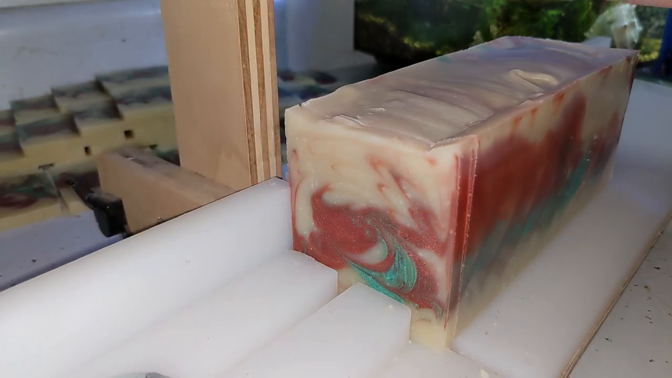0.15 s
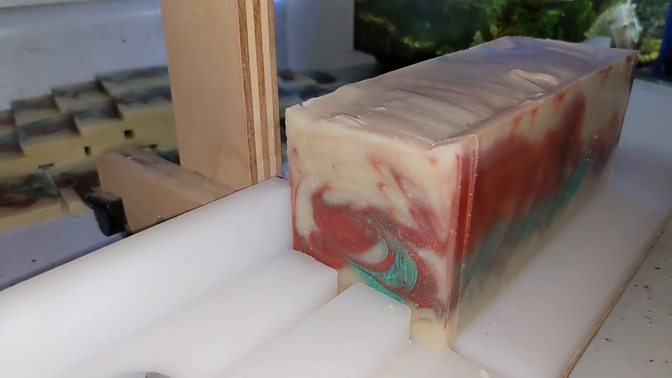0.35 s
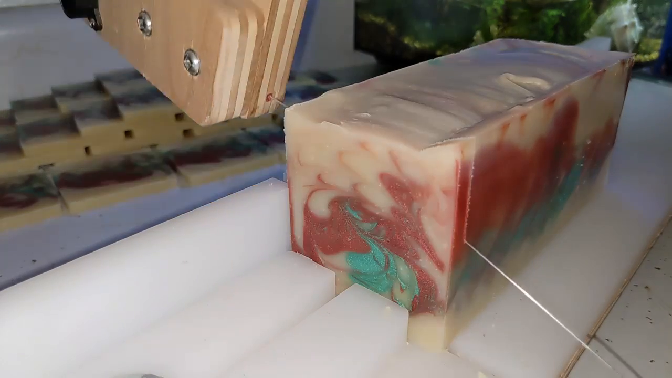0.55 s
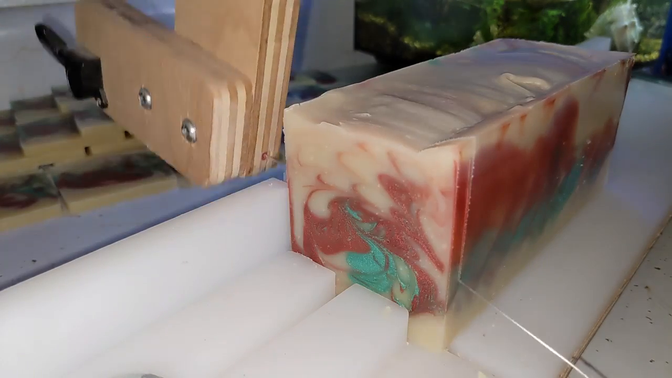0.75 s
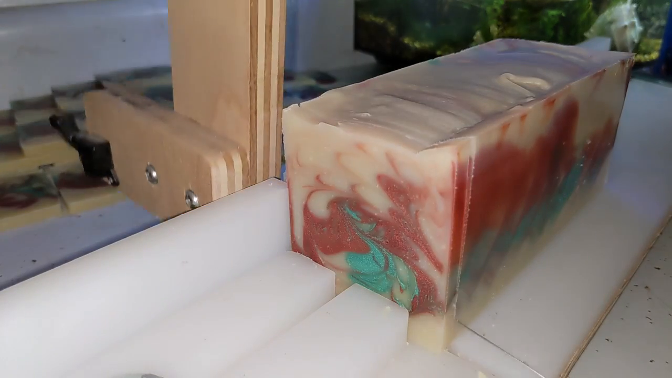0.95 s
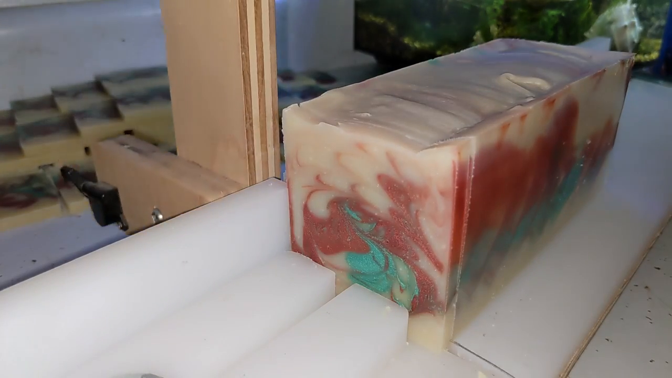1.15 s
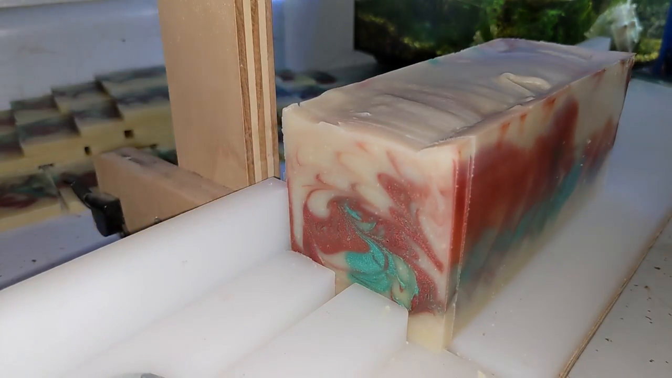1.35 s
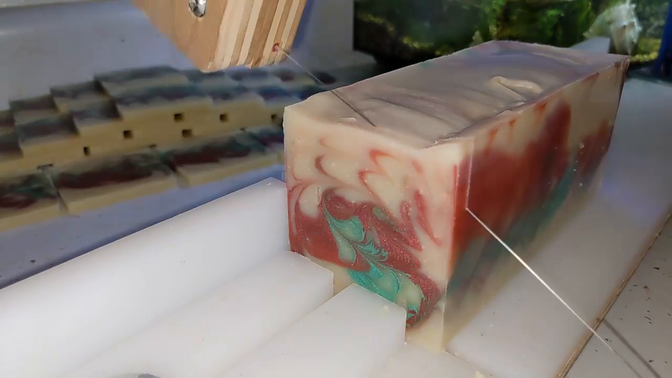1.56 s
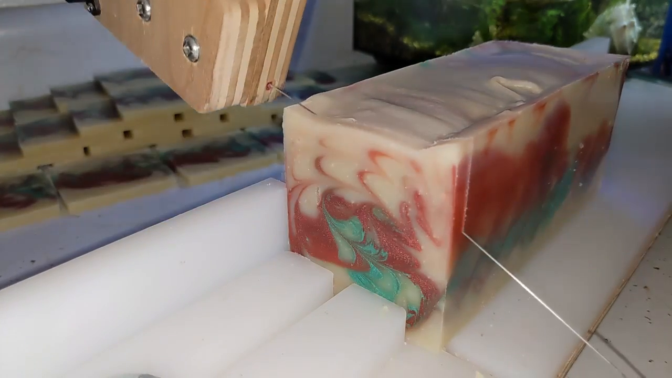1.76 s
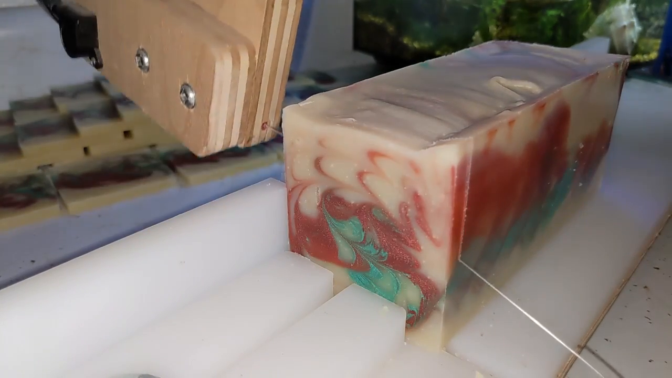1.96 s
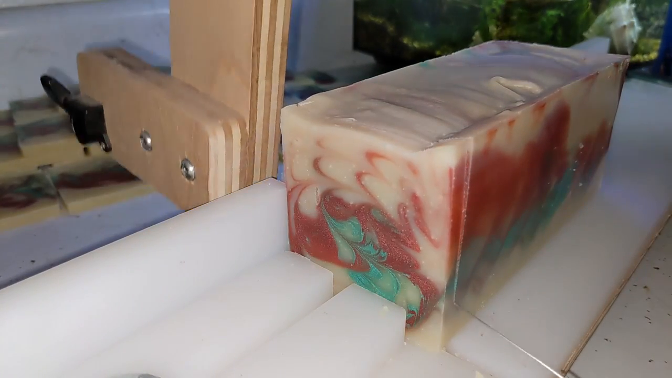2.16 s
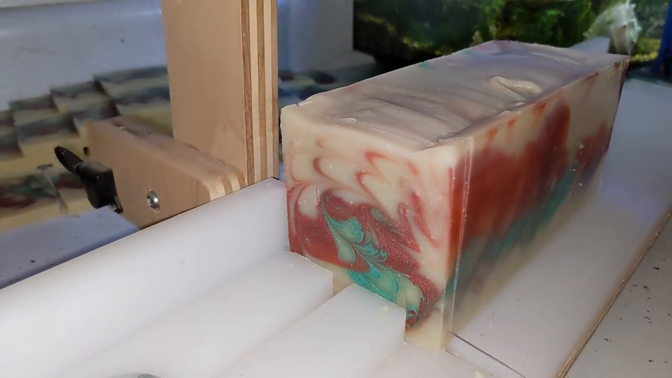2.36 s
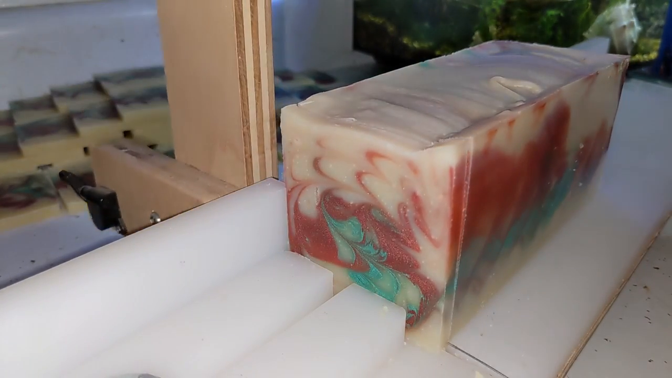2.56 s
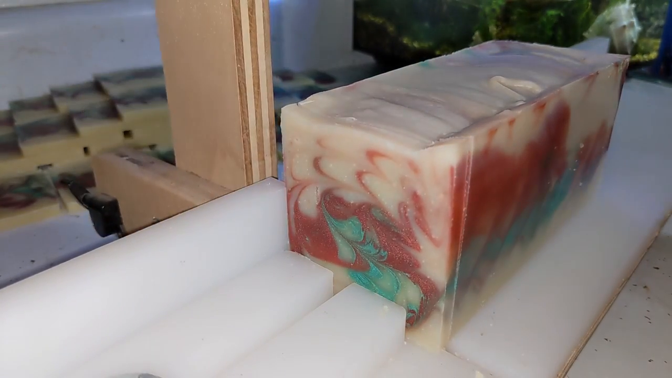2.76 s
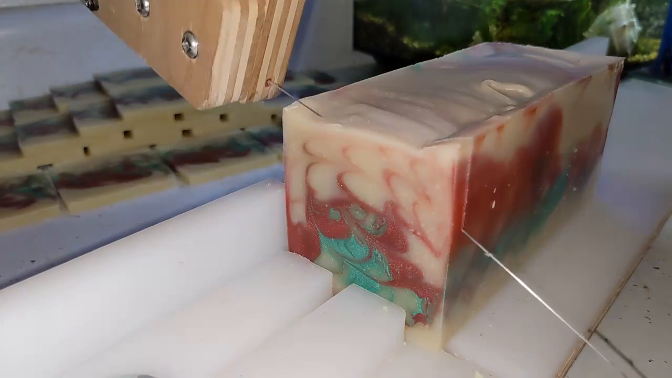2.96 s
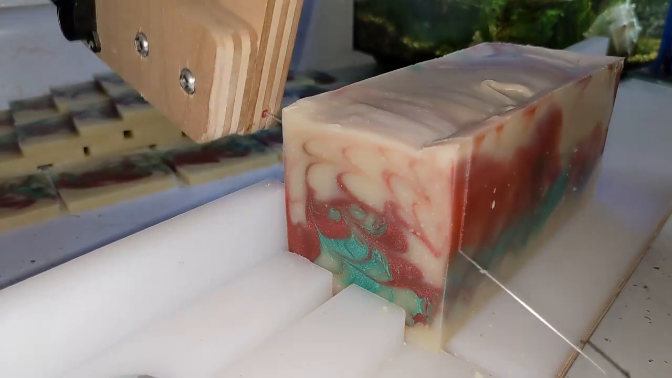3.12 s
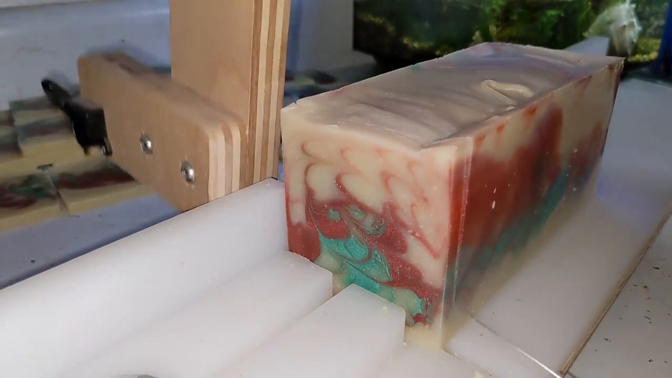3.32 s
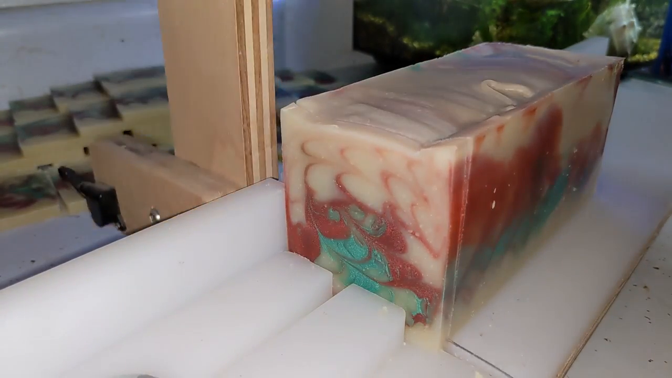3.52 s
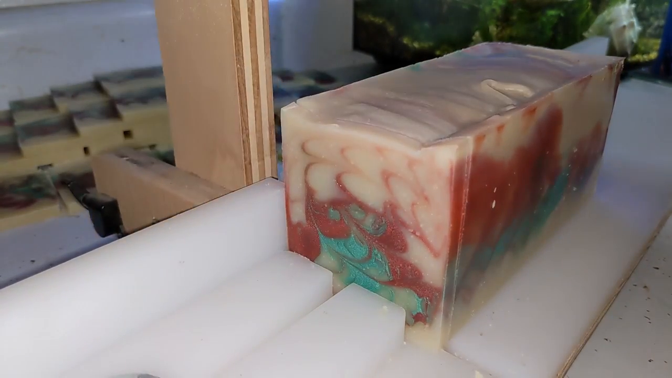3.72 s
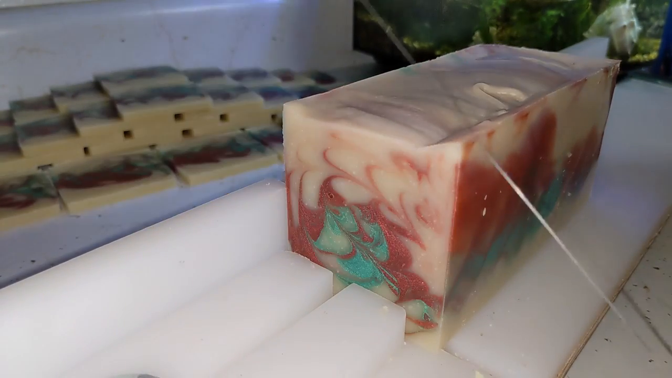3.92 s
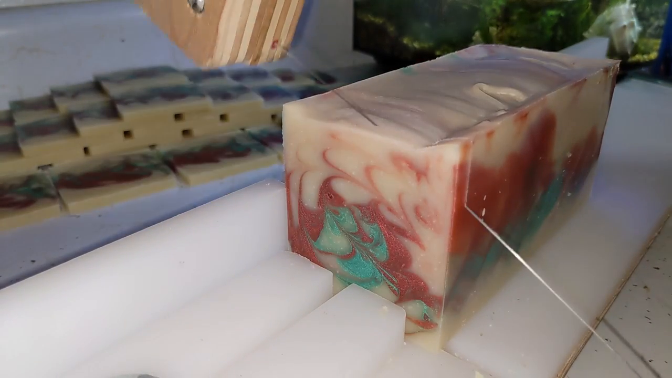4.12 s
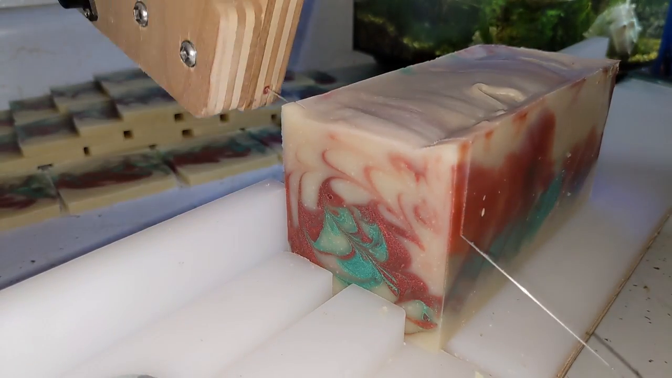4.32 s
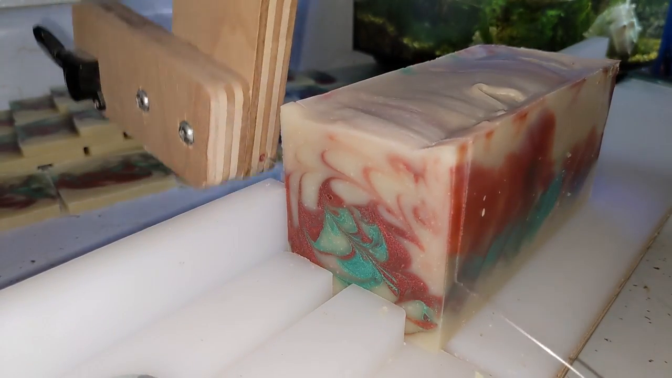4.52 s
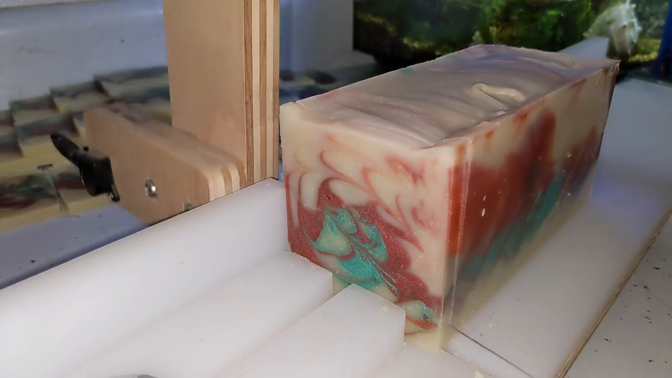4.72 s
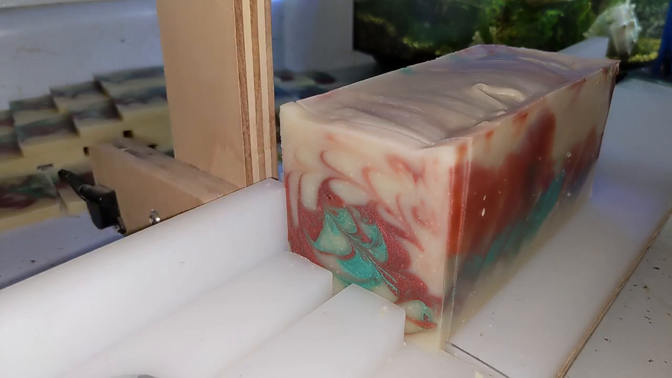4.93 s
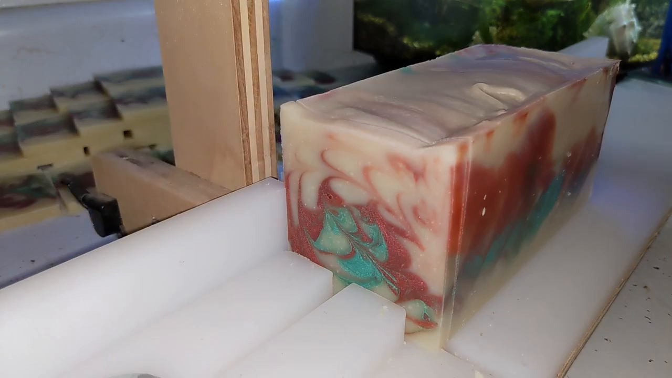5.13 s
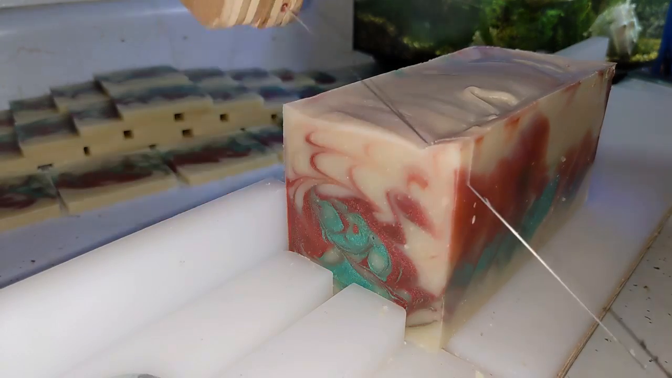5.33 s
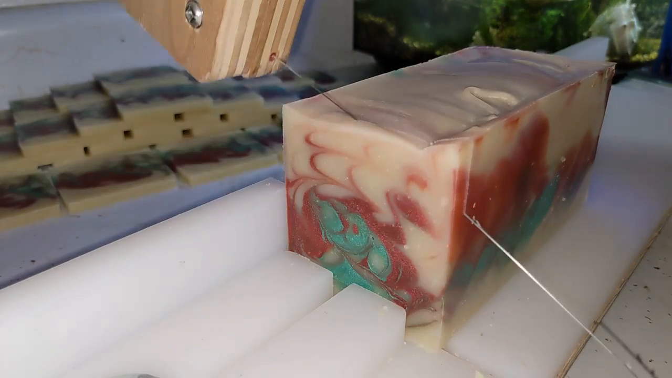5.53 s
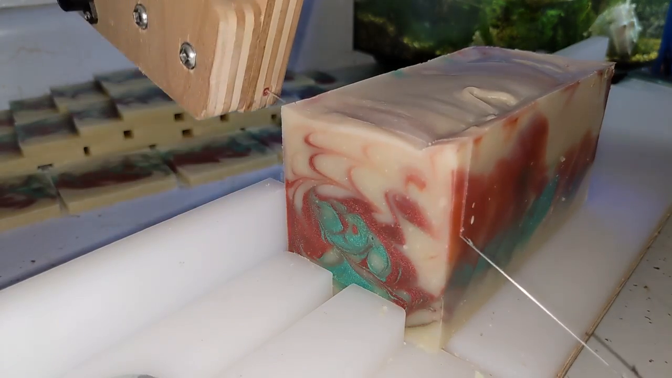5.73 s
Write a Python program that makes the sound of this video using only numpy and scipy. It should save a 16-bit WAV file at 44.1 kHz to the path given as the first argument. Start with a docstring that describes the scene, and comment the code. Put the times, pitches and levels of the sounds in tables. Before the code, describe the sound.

A wire cutter drags through soap with sticky crackling ticks, each of five strokes ending in a sharp crack and woody bench thump.

```python
"""Wire soap cutter

A home workshop, close to a pair of microphones. The wire drags through the loaf with sticky ticks (noise snaps
with gritty tails), then the arm lands: a crack (noise burst), a wooden body and late bench thump (decaying modes)
and the wire ringing on (two beating sines). The pivot pings and knocks (resonators).
A low rumble with hum lines, rubbing, brushing and a fine hiss lie underneath (shaped noise)."""
import sys
import numpy as np
from scipy import signal
from scipy.fft import rfft, irfft
from scipy.io import wavfile

SR = 44100
rng = np.random.default_rng(int(sys.argv[2]) if len(sys.argv) > 2 else 0)


def volts_from_db(level):
    """Convert decibel levels to linear amplitude ratios."""
    exponent = np.asarray(level, float) / 20
    return 10 ** exponent


def transcribe(u):
    """Save the signal u as a 16-bit wav file named by the first command-line argument.

    u: samples, shape (n,) or (channels, n), limited to [-1, 1]; the rate is SR.
    q: integer samples, one column per channel.
    """
    v = np.clip(np.atleast_2d(u).T, -1, 1)
    q = np.round(v * 32767).astype(np.int16)
    wavfile.write(sys.argv[1], SR, q)


N = 254898


def rms_one(x):
    """Scale to rms 1."""
    return x / np.sqrt(np.mean(x ** 2) + 1e-20)


def at_hz(points, hz):
    """Read a table on a log-frequency axis."""
    p = np.array(points, float)
    return np.interp(np.log(hz), np.log(p[:, 0] + 1), p[:, 1])


def in_time(rows):
    """Control curve at every sample."""
    return np.interp(np.arange(N) / SR, *np.transpose(rows))


def drift(rate_hz):
    """Slow random wander of rms 1: noise through a double one-pole low-pass."""
    r = np.exp(-2 * np.pi * rate_hz / SR)
    settle = 9000
    return rms_one(signal.lfilter([1], [1, -2 * r, r * r], rng.standard_normal(N + settle))[settle:])


def clicks(times, gains):
    """Single samples at the given moments."""
    out = np.full(N, 1e-18)
    np.add.at(out, np.round(np.asarray(times) * SR).astype(int), gains)
    return out


def panned(times, db, pan_db):
    """A click train for each port."""
    return np.array([clicks(times, volts_from_db(db + pan_db / 2)), clicks(times, volts_from_db(db - pan_db / 2))])


def fade(x, tau_s):
    """Each click becomes a decaying exponential."""
    return signal.lfilter([1], [1, -np.exp(-1 / (max(tau_s, 1e-5) * SR))], x)


def lead_in(x, tau_s):
    """Each click becomes an exponential that rises up to it."""
    return fade(x[:, ::-1], tau_s)[:, ::-1]


def swell(x, tau_s):
    """Unit-gain double low-pass: an envelope takes time to grow."""
    return fade(fade(x, tau_s), tau_s) * (1 - np.exp(-1 / (tau_s * SR))) ** 2


def ring(x, hz, t60_s):
    """Two-pole resonator: a unit click sets a sine of initial height 1 ringing."""
    r, w = volts_from_db(-60 / (t60_s * SR)), 2 * np.pi * hz / SR
    return signal.lfilter([0, np.sin(w)], [1, -2 * r * np.cos(w), r * r], x)


def band(x, low_hz, high_hz):
    """Butterworth band-pass."""
    return signal.sosfilt(signal.butter(2, [low_hz, min(high_hz, .45 * SR)], "band", fs=SR, output="sos"), x)


def evened(x, times, db, span_s):
    """Rough contacts differ in shape but keep their strength: each is scaled to the usual energy for its dB."""
    order = np.argsort(times)
    start = np.round(times[order] * SR).astype(int)
    end = np.minimum(start + round(span_s * SR), N - 1)
    energy = np.cumsum(np.sum(x ** 2, axis=0))
    ratio = np.sqrt(energy[end] - energy[start - 1] + 1e-30) / volts_from_db(db[order])
    gain = np.median(ratio) / ratio
    return x * gain[np.maximum(np.searchsorted(start, np.arange(N), "right") - 1, 0)]


# left-right likeness of broad noise: (frequency [Hz], likeness [0-1])
LIKENESS = [(60, .85), (290, .82), (640, .33), (1400, .08), (15000, .05)]


def coloured(spectrum):
    """Stereo noise of a given spectrum; mid and side are weighted by the likeness of the ports; rms 1."""
    hz = np.arange(1, N // 2 + 2) * SR / N
    alike = np.clip(at_hz(LIKENESS, hz), 0, 1)
    mid, side = rfft(rng.standard_normal((2, N))) * volts_from_db(at_hz(spectrum, hz))
    pair = np.sqrt(1 + alike) * mid + np.sqrt(1 - alike) * side * [[1], [-1]]
    return rms_one(irfft(pair, N))


def port_noise(shared):
    """White noise of which a share of the power reaches both ports, the right one late."""
    lag_samples = 4
    common, own = rng.standard_normal(N), rng.standard_normal((2, N))
    share = np.clip(shared, 0, 1)
    return np.sqrt(share) * np.array([common, np.roll(common, lag_samples)]) + np.sqrt(1 - share) * own


def struck(times, db, modes, contact_s, spread_db, late_cycles):
    """A rough contact of a few ms excites every mode; bending waves spread, so low modes start late."""
    out = np.zeros((2, N))
    strength_db = spread_db * rng.standard_normal((len(times), len(modes)))
    for k, (hz, level_db, t60_s) in enumerate(modes):
        gain_db = db + level_db + strength_db[:, k]
        contact = swell(clicks(times + late_cycles / hz, volts_from_db(gain_db)), contact_s)
        push = contact * np.sqrt(4 * contact_s * SR)
        out += evened(ring(push * port_noise(0.58), hz, t60_s), times, gain_db, .05)
    return out


def swelling(times, db, modes, spread_db):
    """Low modes take up the blow slowly, so they peak late; strength and tuning differ blow by blow."""
    out, t = np.zeros((2, N)), np.arange(N) / SR
    for hz, level_db, t60_s, swell_s in modes:
        for s, d in zip(times, db):
            i, span = round(s * SR), round(t60_s * 2 * SR)
            decay_db = d + level_db + spread_db * rng.normal() - 60 * t[:span] / t60_s
            shape = swell(volts_from_db(decay_db), swell_s)
            phase = rng.uniform(0, 2 * np.pi) + rng.normal(0, .4, (2, 1))   # ports differ a little
            tuned_hz = hz * rng.normal(1, 0.0071)
            out[:, i:i + span] += shape * np.sin(2 * np.pi * tuned_hz * t[:span] + phase)
    return out


# drag of wire and hand on the soap: (time [s], level [dB])
DRAG = [(0.0, -63), (0.1, -71), (0.25, -76), (0.67, -70.5), (0.95, -65), (1.17, -72.5), (1.5, -73),
        (1.55, -70.5), (1.95, -71), (2.12, -65), (2.28, -66), (2.45, -73.5), (2.8, -76.5), (3.16, -71),
        (3.4, -59), (3.72, -77), (3.89, -63), (4.08, -64), (4.28, -69), (4.46, -71), (4.64, -60),
        (4.81, -67), (5.0, -76.5), (5.28, -69.5), (5.6, -72), (5.78, -79)]


def drag_level():
    """Drag in dB at every sample; steers rubbing, hiss and deep rumble."""
    return in_time(DRAG)


# swells and steps of the rumble: (time [s], level [dB])
SWELL = [(0.0, -61.5), (0.2, -68.5), (0.415, -68.5), (0.425, -64), (1.17, -63), (1.35, -70.5),
         (1.51, -60.5), (1.95, -59), (2.45, -65), (3.7, -63), (3.885, -58.5), (3.895, -65), (4.3, -62.5),
         (4.64, -65), (5.29, -65), (5.3, -64), (5.6, -66), (5.78, -70.5)]


def rumble_level():
    """Rumble in dB at every sample."""
    return in_time(SWELL)


# deep rumble spectrum: (frequency [Hz], relative density [dB])
DEEP = [(25, -31.5), (40, -14), (55, 2.5), (70, -16.5), (90, -9), (120, -4), (150, -19), (250, -56.5)]


def deep_rumble():
    """Lowest noise: swings wider than the rumble and sinks while the loaf is pressed, as drag rises."""
    steered_db = -71 + 3.2 * (rumble_level() + 63.5) - 1 * (drag_level() + 71)
    return volts_from_db(steered_db + 1.8 * drift(3.9)) * coloured(DEEP)


# rumble spectrum: (frequency [Hz], relative density [dB])
RUMBLE = [(65, -34), (110, -5), (265, -6.5), (307, -9.5), (333, -15), (359, 0), (386, -4), (1000, -18.5),
          (1300, -36), (2200, -120)]
# hum lines: (frequency [Hz], level over rumble noise [dB], damping: t60 is 0.63 over this [Hz])
HUM = [(65, -11.5, 0.79), (108.4, -12, 1.4), (169.6, -5.5, 4.1), (311.1, -5.5, 3.3), (380, -16, 17),
       (1137, -14.5, 5.5)]


def rumble_and_hum():
    """Low noise plus hum lines that waver, each a resonator fed with noise."""
    hum = sum(volts_from_db(db) * rms_one(ring(rng.standard_normal(N), hz, 0.63 / damping)) for hz, db, damping in HUM)
    return volts_from_db(rumble_level() + 1.1 * drift(5.7)) * (coloured(RUMBLE) + hum)


# hiss spectrum: (frequency [Hz], relative density [dB])
HISS = [(1760, -16.5), (3000, -4), (6670, -7.5), (7210, -7), (8500, -12.5), (15100, -9.5), (16200, -19),
        (16500, -51)]


def hiss():
    """Fine noise that rises with the drag but never sinks below the microphone's own."""
    steered = volts_from_db(-71 + 1 * (drag_level() + 68))
    mic_floor = volts_from_db(-73)
    return np.maximum(steered, mic_floor) * volts_from_db(0.96 * drift(17)) * coloured(HISS)


# rubbing spectrum: (frequency [Hz], relative density [dB])
RUBBING = [(410, -41), (700, -8.5), (806, -20), (1150, -2), (1570, -6), (3500, -10), (4550, -37.5),
           (7700, -120)]


def rubbing():
    """Friction noise at the drag level, slowly and finely uneven."""
    return volts_from_db(drag_level() + 2.2 * drift(30) + 1.5 * drift(300)) * coloured(RUBBING)


# a hand brushes the loaf: (time [s], half length [s], level [dB])
SWISHES = [(0.406, .02, -64.5), (2.913, 0.018, -63), (3.844, 0.043, -57), (5.247, 0.035, -59.5)]
# brushing spectrum: (frequency [Hz], relative density [dB])
SWISH = [(900, -30), (1800, -5), (3000, -0.5), (7000, -3.5), (9000, -6.5), (15000, -7), (16300, -16),
         (16600, -48)]


def brushing():
    """Bright noise under flat-topped envelopes."""
    t = np.arange(N) / SR
    swish = sum(volts_from_db(db) * np.exp(-((t - s) / half_s) ** 4 / 2) for s, half_s, db in SWISHES)
    return swish * volts_from_db(2.0 * drift(45)) * coloured(SWISH)


# pivot: (time [s], ping level [dB], frequency [Hz], tick level [dB])
PINGS = [(0.4886, -56, 1665, -35.5), (1.527, -60.5, 1480, -46.5), (1.6649, -64, 1530, -40),
         (1.719, -58, 1660, -42), (1.889, -55.5, 1830, -38), (2.932, -57, 1640, -45.5),
         (3.1002, -59, 1800, -37.5), (4.2475, -58.5, 1650, -54), (5.596, -62.5, 1620, -44),
         (5.678, -65.5, 1650, -45)]
# the arm meets its upper stop: (time [s], level [dB])
KNOCKS = [(4.1227, -30.5), (5.4263, -31)]
# modes of the stop: (frequency [Hz], level [dB], t60 [s])
STOP = [(302, -19.5, 0.14), (426, -11, 0.045), (625, -17, 0.035), (820, -17, 0.04), (1270, -7.5, 0.033),
        (1525, -1, 0.019), (1580, -5.5, 0.036), (2170, -20, 0.026), (2980, -2.5, 0.036), (4580, -4, 0.025),
        (6400, 2.5, 0.0094), (9100, -7, 0.014)]


def pivot():
    """Short single-note resonator pings, nearer the right port, and two modal knocks on the stop."""
    pings = np.zeros(N)
    for s, db, hz, _ in PINGS:
        pings += ring(swell(clicks([s], volts_from_db(db + 21)), 0.00025), hz, 0.042)
    s, db = np.transpose(KNOCKS)
    rattle_shape = swell(fade(clicks(s, volts_from_db(db - 12.5)), 0.013), 0.0002)
    rattle = band(rattle_shape * port_noise(0.14), 330, 11000)
    return pings * volts_from_db(np.array([[-2.5], [2.5]])) + struck(s, db + 0.5, STOP, 0.0018, 1.14, 1.97) + rattle


# crack spectrum: (frequency [Hz], relative density [dB])
CRACK = [(530, -29.5), (900, -17), (2080, -6), (4770, -5), (5320, -9), (6010, -5), (9780, -7), (11500, -2),
         (15700, -4), (16500, -40.5)]


def crack(s, db, pan_db):
    """Wire and arm land over some 6 ms: a noise burst with a brief fade-in ahead and a tail."""
    hits = panned(s, db, pan_db)
    burst = fade(fade(hits, 0.006), 0.00055) / (0.00041 * SR)
    burst += volts_from_db(-14.5) * fade(hits, 0.026) + volts_from_db(-29.5) * fade(hits, 0.029)
    burst += lead_in(panned(s, db - 5.5, pan_db), 0.00069)     # noise rises steeply into the crack
    burst += lead_in(panned(s, db - 26, pan_db), 0.004)
    burst *= volts_from_db(2.5 * drift(150) + 0.8 * drift(40))     # the frame rattles unevenly
    return evened(burst * coloured(CRACK), s - .012, db, .025)


# frame modes: (frequency [Hz], level [dB], t60 [s])
FRAME = [(1110, -8, .03), (1400, -3, .045), (1790, -9, .025), (2170, -6, .03), (2320, -7, .045),
         (2850, -12, .025), (3200, -12, .025)]
# wooden body modes: (frequency [Hz], level [dB], t60 [s], swell [s])
BODY = [(201.2, -11, 0.063, 0.023), (277.7, -4.5, 0.046, 0.0026), (312, -11, 0.043, .006),
        (389.4, -4.5, .09, 0.0047), (429.2, -0.5, 0.081, 0.0018), (462, -11, 0.061, 0.01),
        (588, -11, 0.09, 0.0013), (710, -8.5, 0.08, 0.0013), (774, -7.5, .06, 0.0026)]
# bench modes: (frequency [Hz], level [dB], t60 [s], swell [s])
BENCH = [(58, -19, 0.12, 0.018), (102.6, -13, 0.087, 0.0095), (132.5, -7.5, .15, 0.01),
         (154.1, -3.5, .17, 0.0062)]


def wood(s, db):
    """Frame modes ring first, body modes swell, the bench thumps last; noise stands for dense wood modes."""
    frame = struck(s, db - 0.8, FRAME, 0.0052, 4.7, 2.9)
    body = evened(swelling(s + .003, db + 2.5, BODY, 1.3), s, db, .04)
    bench = swelling(s + 0.011, db - 1.15, BENCH, 0.5)
    dense = fade(clicks(s, volts_from_db(db + 10)), 0.024) + fade(clicks(s, volts_from_db(db - 12.5)), 0.039)
    return frame + body + bench + band(swell(dense, 0.0014) * port_noise(0.28), 110, 610)


def wire(s, db, rings_s):
    """The wire swings in two planes slightly apart in pitch, so it beats; the note ends abruptly."""
    wire_hz, beat_hz, wire_db, t60_s = 367.5, 28, -31.5, 0.8
    out, t = np.zeros(N), np.arange(N) / SR
    for start, level_db, length_s in zip(s, db, rings_s):
        age = t - start
        sounding = volts_from_db(2.7 * drift(25)) * (age > 0) * np.clip((length_s - age) / 0.0025, 0, 1)
        decay = volts_from_db(level_db + wire_db - 60 * np.abs(age) / t60_s)
        planes = np.sin(2 * np.pi * wire_hz * age) + 0.6 * np.sin(2 * np.pi * (wire_hz + beat_hz) * age)
        out += sounding * decay * planes
    return out


# the arm lands: (time [s], crack level [dB], wood level [dB], left-right [dB], wire ringing [s])
BLOWS = [(0.182, -16.5, -27.5, 6.5, 0.19), (1.2887, -15.5, -23.5, 0, 0.4), (2.686, -15.5, -16, 5, 0.2),
         (3.622, -15.5, -24.5, 1, 0.27), (5.049, -16, -22.5, 4.5, 0.15)]


def blows():
    """Each landing sounds the crack, the wood and the wire."""
    s, crack_db, wood_db, pan_db, rings_s = np.transpose(BLOWS)
    return crack(s, crack_db, pan_db) + wood(s, wood_db) + wire(s, crack_db, rings_s)


# soap lets go of the wire: (time [s], level [dB], left-right [dB], fullness: lower against upper treble [dB])
TICKS = [(0.0156, -17, 7, 0), (0.0705, -22, 9.5, -0.5), (0.0865, -32, 3, 1.5), (0.0897, -28, 9.5, 1.5),
         (0.5743, -42.5, 9.5, -3.5), (0.6416, -52, 6.5, 1), (0.6612, -51, 6.5, 2), (0.6697, -50, 6, -8),
         (0.6834, -50, 0, -4), (0.7058, -46, 6, -2), (0.7259, -20, 8.5, -4), (0.7464, -33, 6, 2),
         (0.7972, -35, 10, 1), (0.8077, -45.5, -1, -9), (0.8524, -38, 19, -2), (0.8656, -35, 3, -4),
         (0.8719, -29, 9.5, -9.5), (0.8848, -41.5, 1.5, -3.5), (0.8953, -11, 9, -16),
         (0.9186, -30.5, 3, -4.5), (0.9601, -43.5, 12, -11), (0.9907, -46, 2, -7),
         (1.0082, -27.5, 6.5, -10.5), (1.0449, -26, 12, -4.5), (1.0633, -40, 6, -1.5),
         (1.086, -20.5, 13, -8), (1.1315, -18.5, 3, -9.5), (1.1402, -33.5, 3.5, -8.5),
         (1.1922, -40.5, 5, -1.5), (1.5269, -22, 3, -13.5), (1.5866, -44, 3, -6), (1.6487, -47, 1, -9),
         (1.7477, -34, 11, -6.5), (1.9232, -31, 4.5, -11), (1.9382, -34, -3, -1.5),
         (1.9562, -27.5, 13, -8.5), (1.965, -33.5, 6, -4), (1.9709, -32, 3, -5), (2.0036, -39.5, 4, -9),
         (2.0162, -45, 18, 3), (2.0241, -50, -1, -0.5), (2.0889, -27, 9.5, 2), (2.1149, -23.5, 11.5, -5.5),
         (2.1673, -44, 10, 9), (2.2, -47, 6, 6), (2.2143, -19.5, 3.5, -10), (2.2401, -24, -7, -3.5),
         (2.2625, -39.5, 3.5, -8.5), (2.303, -22, 0, 4.5), (2.3173, -27, 9.5, -7.5), (2.3504, -47, 6, 3),
         (2.3895, -12.5, 11, -11.5), (2.4221, -28.5, 15, -7.5), (2.5091, -33.5, 16, 4),
         (2.5904, -45.5, 3, 10), (3.1762, -44, 8, -11), (3.2188, -35.5, 11, -6), (3.2373, -30, 5.5, -0.5),
         (3.2557, -45, 3, -2), (3.2698, -41, 4.5, 4), (3.2885, -31.5, 7, -13), (3.3121, -26, 4, -6.5),
         (3.3267, -40, 0, -5.5), (3.3817, -39, 4, -6.5), (3.3912, -32, 5, -4.5), (3.3969, -39.5, -4, 10),
         (3.4016, -25.5, -1, -11.5), (3.4192, -32, -3, -8.5), (3.4436, -35, 4, -2), (3.4482, -32.5, 3, 5),
         (3.465, -26.5, 8, -5), (3.5121, -22, 3.5, 1.5), (3.5865, -41.5, 10.5, 1), (4.1874, -54, -3, 23),
         (4.1972, -26, 4.5, -15), (4.3456, -27, 12, -8.5), (4.4332, -45.5, 17, -1), (4.4497, -32, 0, -13.5),
         (4.4838, -45.5, -4, 2), (4.5375, -35, 9.5, -4), (4.5421, -25.5, 5.5, -7.5), (4.567, -11, 8, -1.5),
         (4.6099, -24, 4, 1.5), (4.619, -41, 10, 21), (4.6268, -30.5, -6.5, -8), (4.6657, -31, 13, -1.5),
         (4.7107, -35, -4, 6), (4.7186, -19.5, 7.5, -8), (4.7309, -28.5, 4, -11), (4.7717, -17, 4, -12.5),
         (4.8827, -53, 2, -3), (4.983, -42.5, 5, 0), (5.4138, -20, 3, -11), (5.6381, -29.5, 8, -4)]


def all_ticks():
    """Loud ticks, faint ones at random in their wake, pivot ticks; rows: s, dB, pan, fullness, dull part."""
    count = 45
    loud_s = np.transpose(TICKS)[0]
    place, draw = rng.random((count, 2)), rng.standard_normal((count, 3))
    parent_s = loud_s[(place[:, 0] * len(TICKS)).astype(int)]
    faint_s = parent_s + 0.0064 - 0.03 * np.log(1 - place[:, 1])     # exponential delay
    faint = [faint_s, -51 + 3 * draw[:, 0], 9 + 2.5 * draw[:, 1], 6.9 * draw[:, 2] - 3.0]
    soap = np.hstack([np.transpose(TICKS), faint])
    soap = np.vstack([soap, -22 + 1.1 * soap[3]])     # a fuller tick reaches lower
    pivot_pan_db, pivot_fullness_db, pivot_dull_db = -3, -2.5, -10
    pivot_ticks = [(s, db, pivot_pan_db, pivot_fullness_db, pivot_dull_db) for s, _, _, db in PINGS]
    return np.hstack([soap, np.transpose(pivot_ticks)])


def ticks():
    """Stick-slip: a short fade-in, a snap under 1 ms and a gritty tail, in three ranges balanced tick by tick."""
    s, db, pan_db, fullness_db, dull_db = all_ticks()
    tail_db = -48 + 0.75 * (db + 27.5) - db     # the tail follows 3/4 of the level's swing
    slips = fade((rng.random(N) < 250 / SR) * rng.exponential(1, N), 0.00017)     # smaller slips in the tail
    ranges = ((dull_db + 16.0, 900, 3400),
              (fullness_db / 2 + 8, 3300, 9500),
              (6.5 - fullness_db / 2, 9500, 17500))
    out = 0
    for lift_db, low_hz, high_hz in ranges:
        level_db = db + lift_db
        hits = panned(s, level_db, pan_db)
        snap = volts_from_db(-11) * fade(fade(hits, 0.00011), .0001) * np.sign(port_noise(.7))
        snap = evened(band(band(snap, low_hz, high_hz), low_hz, high_hz), s, level_db, .0015)
        grit = (0.74 + 1.6 * slips) * volts_from_db(1.6 * drift(300))
        tail = grit * fade(panned(s, level_db + tail_db, .5 * pan_db), 0.0054)
        tail += volts_from_db(-20.0) * lead_in(hits, 0.001)     # each tick fades in just ahead of its snap
        tail += fade(panned(s, level_db - 34.0, .3 * pan_db), .02)     # the room answers
        tail += volts_from_db(-39.5) * lead_in(hits, 0.004)
        out = out + snap + band(band(tail * port_noise(0.03), low_hz, high_hz), low_hz, high_hz)
    return out


def scene():
    """All sources at the two ports."""
    ground = deep_rumble() + rumble_and_hum() + hiss() + rubbing() + brushing()
    return ground + pivot() + blows() + ticks()


def band_limit(x):
    """A steep low-pass at the top of the band."""
    return signal.sosfilt(signal.butter(12, 16820, fs=SR, output="sos"), x)


def record(dry):
    """The loudest peaks overload and the top is cut."""
    overloaded = np.clip(dry, -.9, .9)
    finished = signal.sosfilt(signal.cheby2(16, 50, 16900, fs=SR, output="sos"), overloaded)
    return band_limit(finished)


dry = scene()
out = record(dry)
transcribe(out)
```